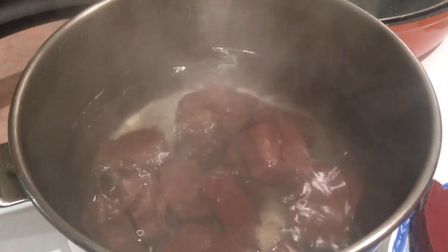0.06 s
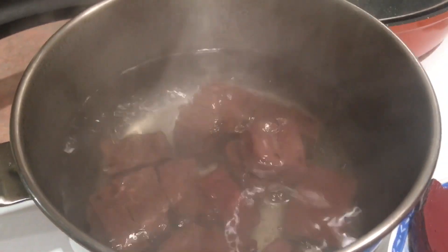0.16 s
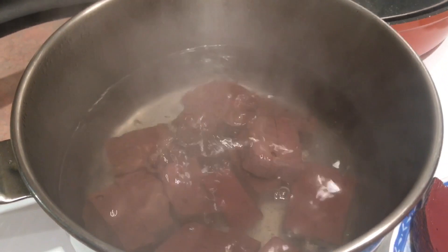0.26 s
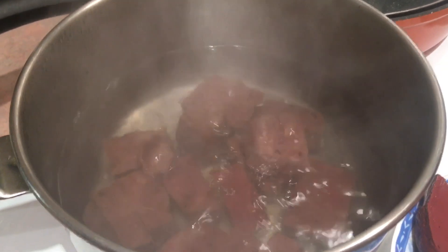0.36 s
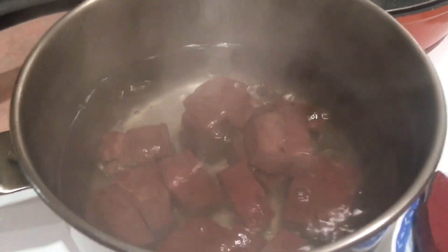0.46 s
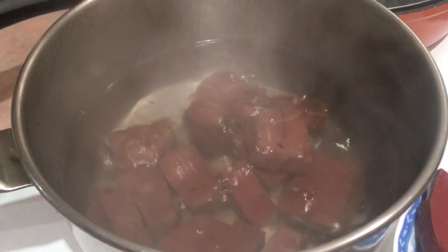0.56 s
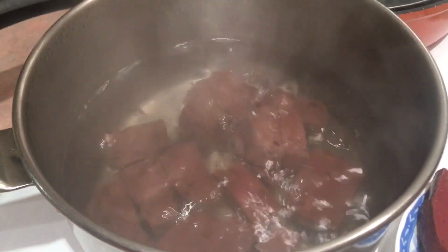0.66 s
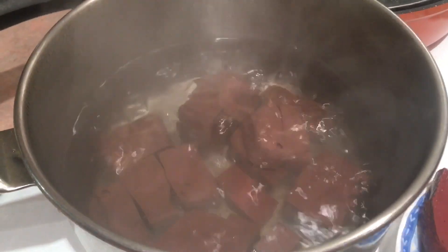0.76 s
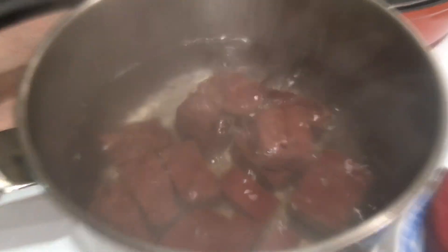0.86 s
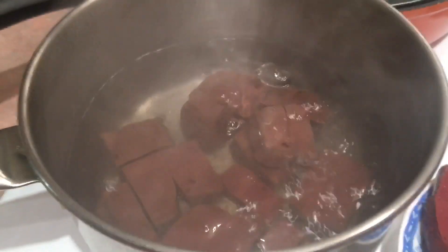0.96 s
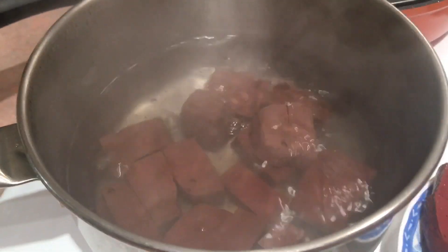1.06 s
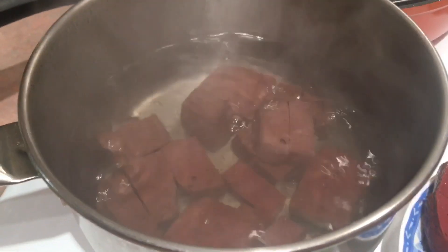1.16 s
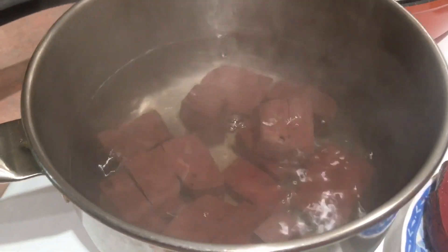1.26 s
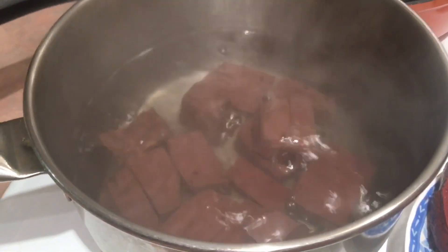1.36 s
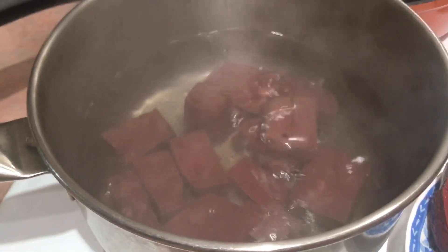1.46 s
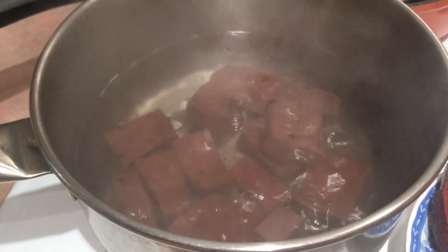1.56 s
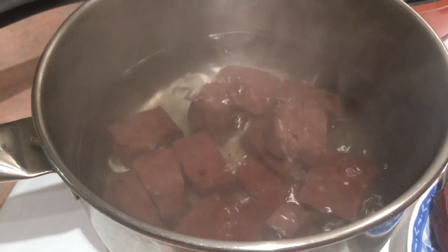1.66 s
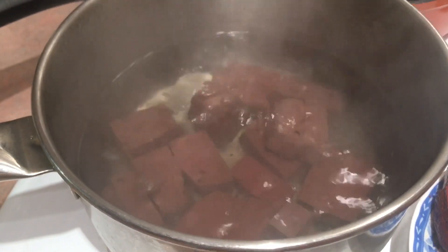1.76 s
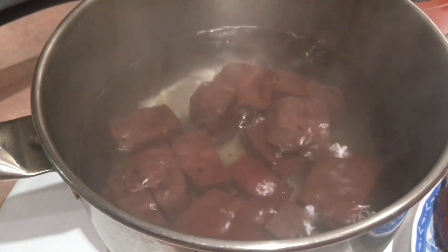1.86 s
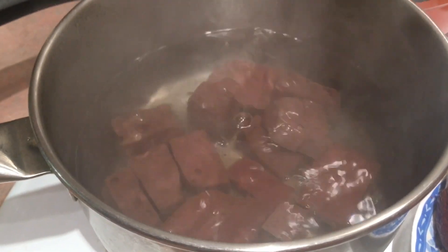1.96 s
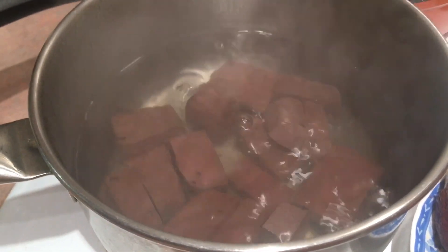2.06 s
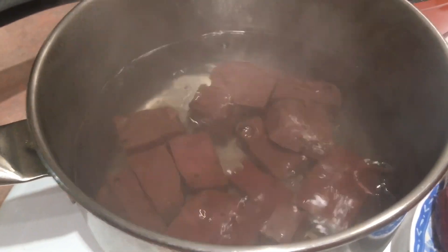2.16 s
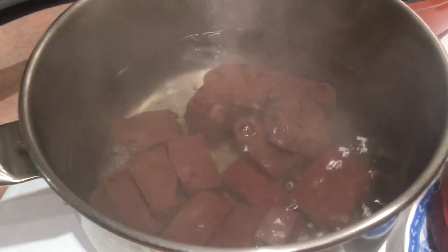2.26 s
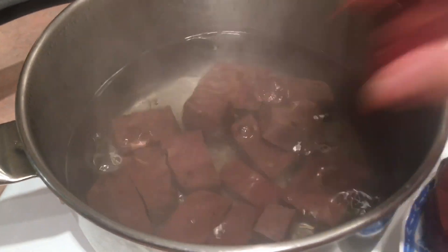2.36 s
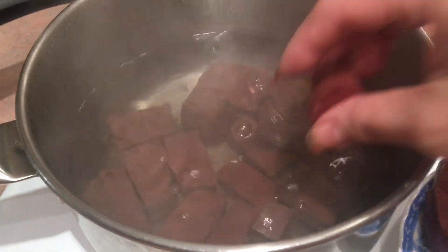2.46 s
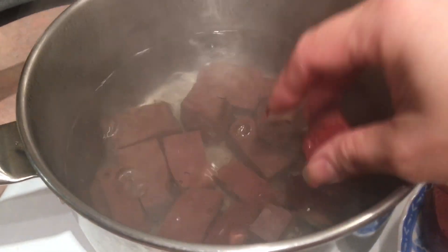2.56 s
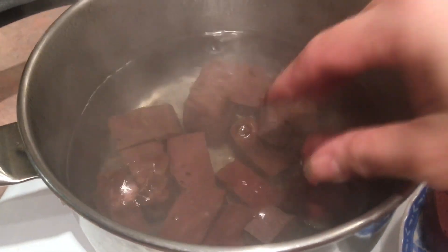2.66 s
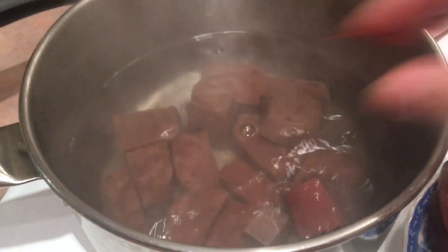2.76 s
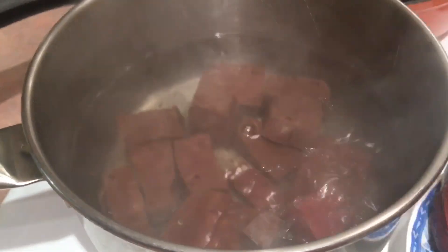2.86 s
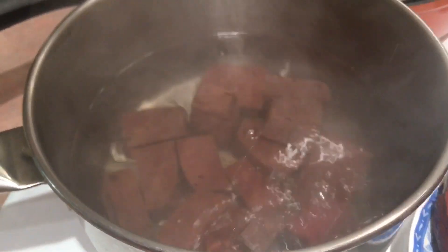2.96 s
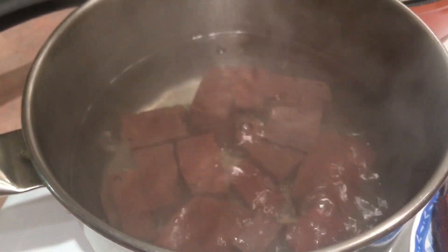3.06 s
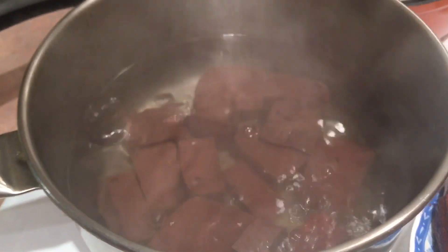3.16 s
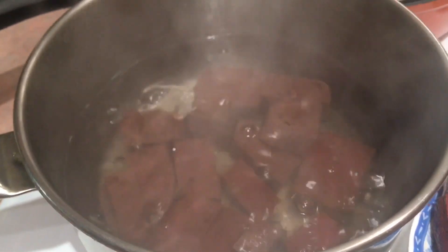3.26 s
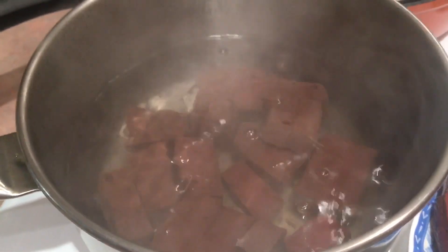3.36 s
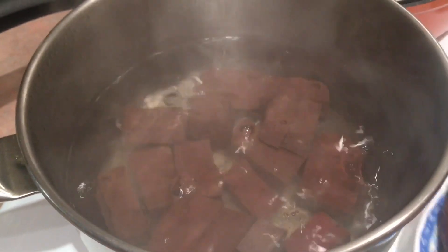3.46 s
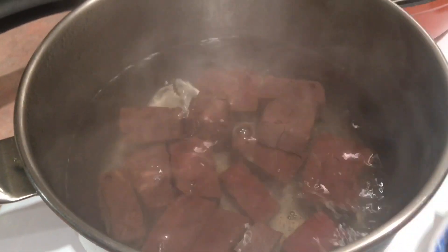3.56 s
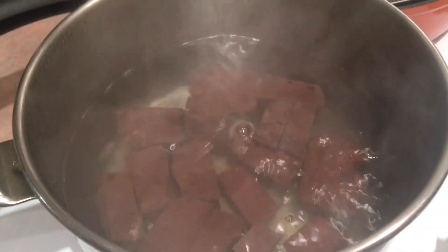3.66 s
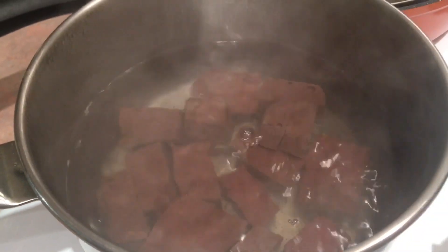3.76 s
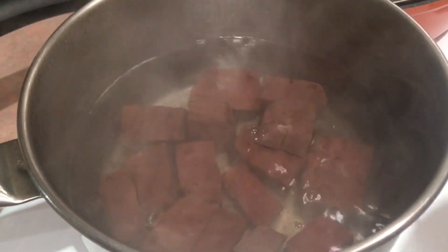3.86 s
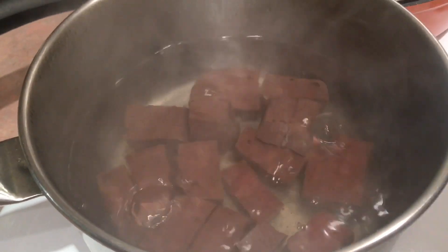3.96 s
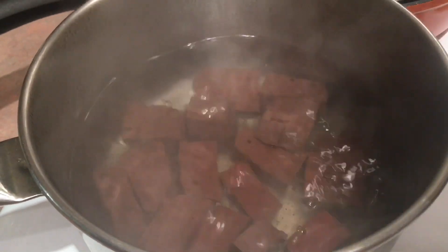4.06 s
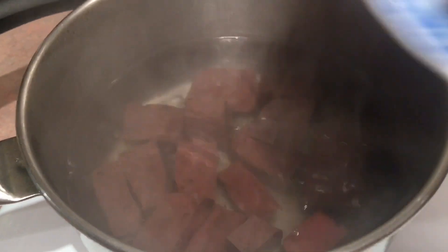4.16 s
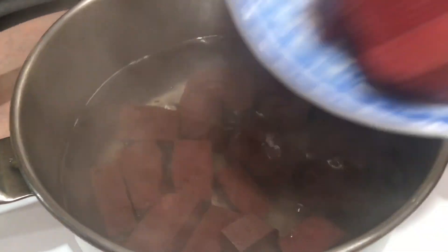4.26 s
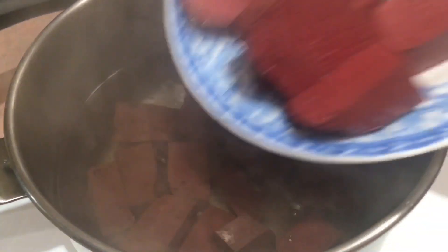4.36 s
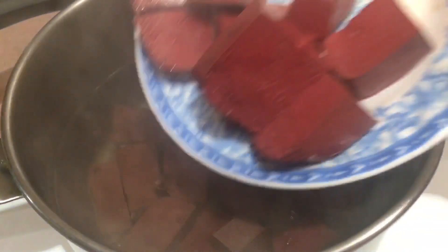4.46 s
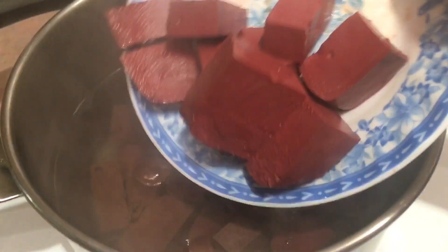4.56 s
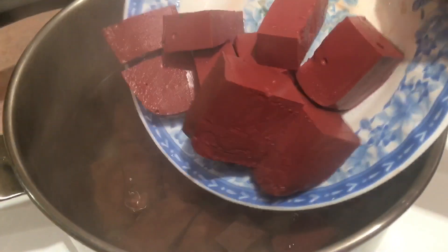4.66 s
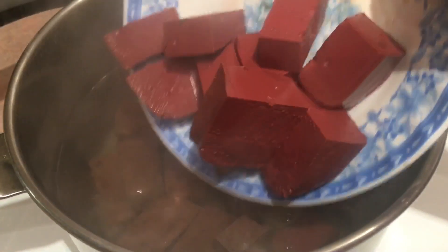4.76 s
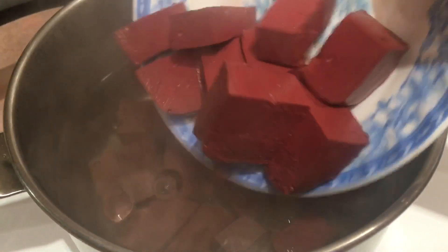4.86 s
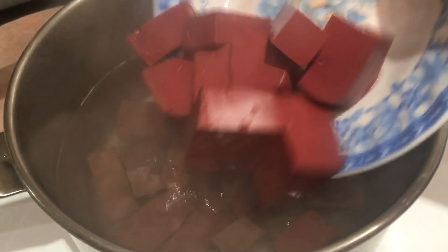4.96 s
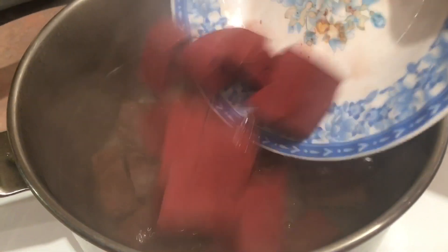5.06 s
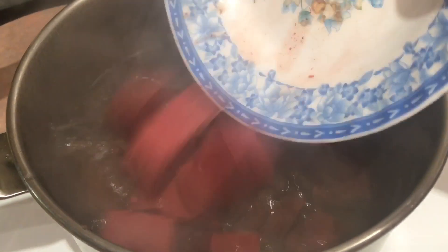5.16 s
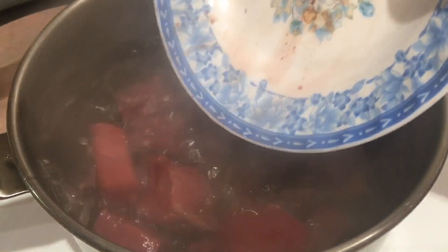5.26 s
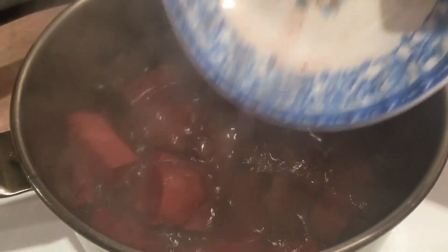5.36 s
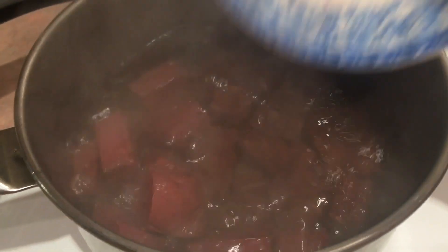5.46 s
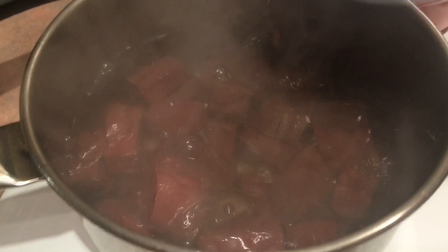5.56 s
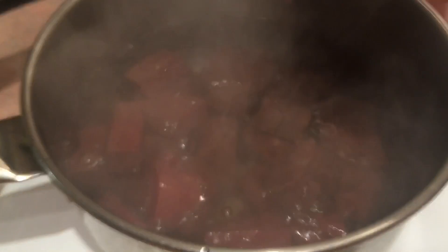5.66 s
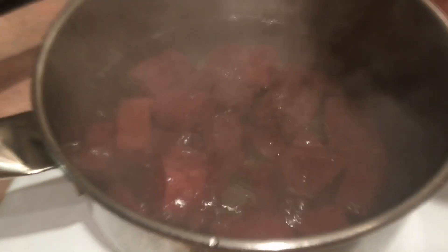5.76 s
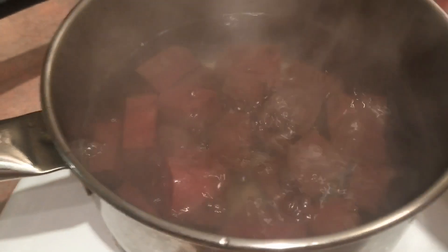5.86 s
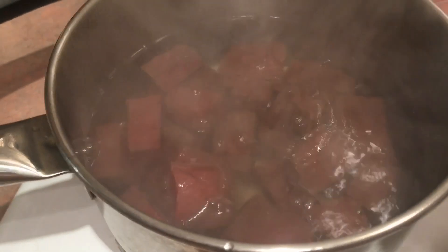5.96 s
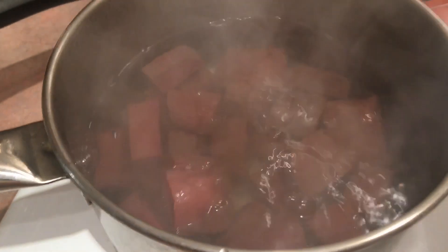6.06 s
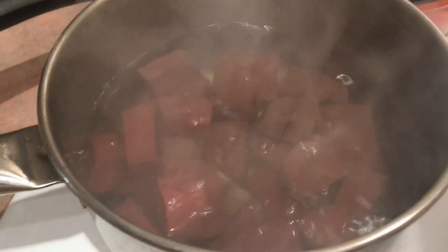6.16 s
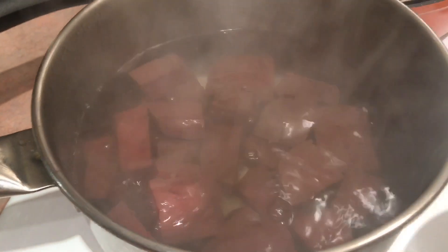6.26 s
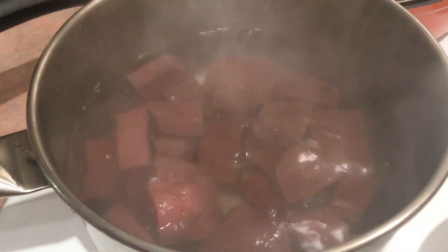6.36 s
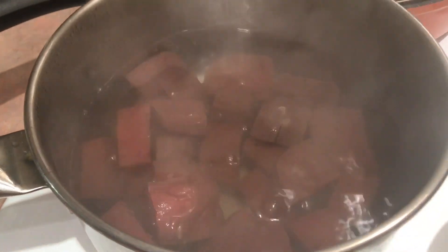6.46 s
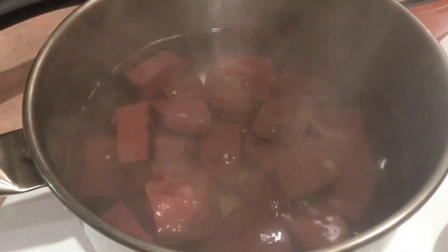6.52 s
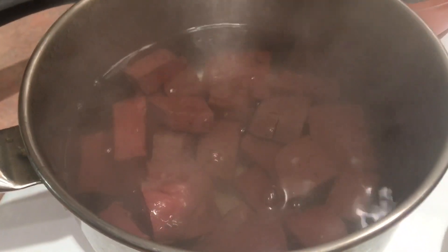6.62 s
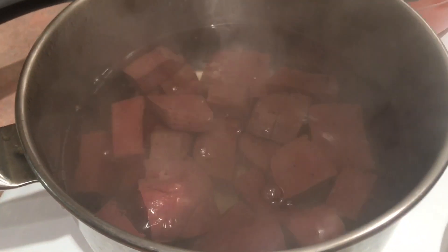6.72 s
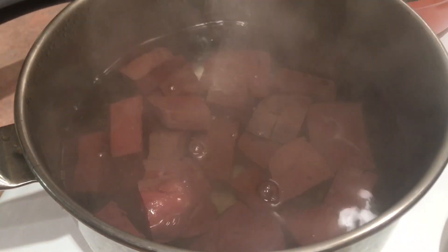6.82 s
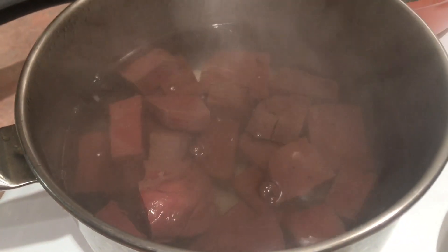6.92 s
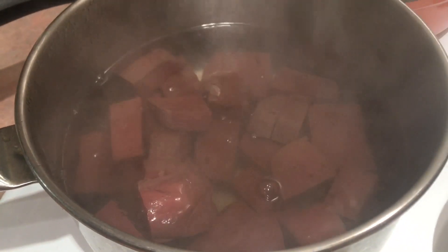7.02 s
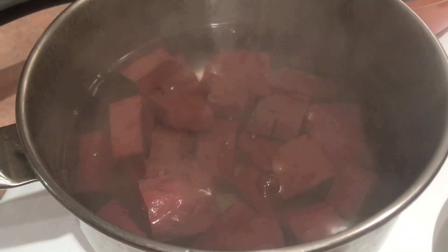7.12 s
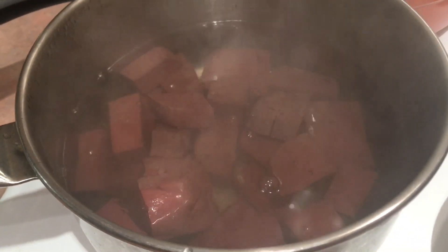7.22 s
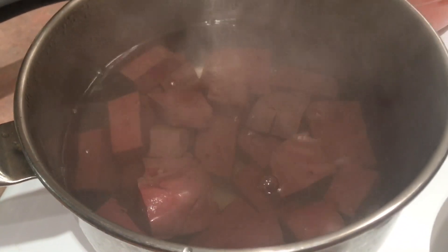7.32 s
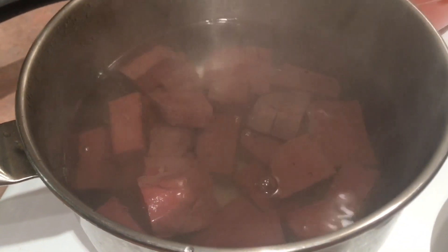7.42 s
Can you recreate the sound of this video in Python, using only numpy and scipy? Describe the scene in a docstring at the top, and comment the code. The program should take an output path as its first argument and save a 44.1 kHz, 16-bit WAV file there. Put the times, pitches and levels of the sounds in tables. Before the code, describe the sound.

Close to a steel pot in a small, hard-walled kitchen, boiling water bubbles and spits throughout over a faint hum and hiss. After a few light crockery clinks and low thumps comes one loud plop of food hitting the water, then a quick flurry of splashes as more cubes slide in. A plate cracks brightly against the rim, drags along it and lands on the counter with a duller knock.

```python
"""A kitchen, small and hard-walled, one microphone close to a steel pot of water boiling on the stove.
Vapour bubbles collapse in bunches and knock the pot wall; cubes of food slide in, plop and splash.
A plate strikes the rim, drags along it and is set down on the counter. Crockery clinks nearby and
dull bumps come through the stove top. Behind it all lie a fine fizz, a mains hum, a low tone that
comes and goes, a low rumble and a steady hiss."""
import sys
import numpy as np
from scipy import signal
from scipy.fft import rfft, irfft, next_fast_len
from scipy.io import wavfile
from scipy.ndimage import uniform_filter1d

SR = 44100
rng = np.random.default_rng(int(sys.argv[2]) if len(sys.argv) > 2 else 0)


def put_to_file(sound):
    """Save the sound as 16-bit audio at rate SR, in the file named by the first command-line argument."""
    columns = np.atleast_2d(sound).T  # one column per channel
    safe = np.clip(columns, -1, 1)
    whole_steps = np.round(safe * 32767)
    wavfile.write(sys.argv[1], SR, whole_steps.astype(np.int16))


N = 330309

# modes of the plate against the pot rim: pitch_hz, level_db, t60_s
RIM_MODES = [(159, -20, 0.13), (412.5, -17, 0.049), (576, -21, 0.069), (704, -6, 0.12), (1110, -10, 0.16),
             (1586, -4.5, 0.032), (2012, -14, 0.078), (2560, -16, 0.045), (2770, -17, 0.089),
             (3070, -10, 0.036), (3250, -19, 0.069), (3510, -3.5, 0.035), (4430, -8, 0.071),
             (4940, -19, 0.074), (5200, -30, 0.04), (6330, 2.5, 0.029), (6660, -19, 0.073),
             (7340, -10, 0.047), (8740, -5, 0.026), (11900, -2, 0.024)]


def boil():
    """Bubbles of very unlike sizes collapse in bunches, each a soft push into the pot's modes."""
    # vigour of the boil: time_s, level_db
    vigour = [(0.0, -49.5), (0.21, -50.5), (2.09, -50.5), (2.86, -48.5), (3.15, -47.5), (4.57, -52.5),
              (5.23, -47.5), (5.65, -51), (5.82, -50), (6.55, -49), (7.07, -49.5), (7.49, -51.5)]
    # modes of the water-filled pot: pitch_hz, width_hz, level_db
    pot_modes = [(243, 206, 1.5), (320, 53, 1), (502, 43, -3), (644, 47, 0.5), (731, 25, -7), (846, 95, -6),
                 (988, 28, -6.5), (1142, 45, -3), (1190, 410, -3.5), (1735, 41, -6.5), (2063, 180, 1),
                 (2424, 68, 0), (3200, 150, -16), (4070, 440, -4)]
    base_rate_hz, push_s = 450, .0006
    bunching_db = np.minimum(0.49 * walk(14) + 7.5 * walk(60), 10)
    chance = base_rate_hz / SR * undb(bunching_db)
    sizes = np.minimum(rng.exponential(size=N), 3.5)
    collapses = (rng.random(N) < chance) * undb(3.7 * sizes) * np.sign(noise(N))
    pushes = np.convolve(collapses, np.hanning(3 + int(push_s * SR)), "same")
    drive = level(pushes, 0) + level(noise(N), -9)
    rings = sum((-1) ** k * undb(db) * band(drive, hz, width) / np.sqrt(width)
                for k, (hz, width, db) in enumerate(pot_modes))
    water = level(rings, 0) + level(surface_bubbles(), -7.5)
    surge_db = .8 * walk(8)
    return water * undb(curve(vigour) + surge_db)


def surface_bubbles():
    """Bubbles burst at the surface in groups of four; each rings a few cycles and rises in pitch."""
    out = np.zeros(N)
    for when, group in zip(rng.random(220), rng.random((220, 4, 3))):
        for late, pitch, softness in group:
            hz = 420 * 3.21 ** pitch ** 1.606
            ring = damped_tone(hz, t60=18 / hz, glide=0.083, rise_s=2 / hz)
            add(out, when * N / SR + .045 * late, undb(-14 * softness) * ring)
    return out


def knocks():
    """The strongest collapses knock the wall: a low ragged tone, an upper ring, a blur of other modes."""
    # start_s, level_db, pitch_hz, upper_ring_hz, upper_ring_relative_db
    collapses = [(0.297, -48, 473, 1190, -16), (0.416, -36, 626, 880, -17), (0.554, -40, 420, 880, -12),
                 (0.612, -34, 600, 1150, -7), (0.983, -37, 626, 970, -6), (1.03, -39, 613, 1160, -12),
                 (1.091, -37, 660, 1160, -1), (1.112, -29, 650, 1220, -18), (1.224, -33.5, 546, 1230, -11),
                 (1.247, -37.5, 514, 1200, 0.5), (1.321, -35, 630, 1000, -14), (1.343, -37, 720, 970, -13),
                 (1.448, -39, 690, 1140, 2), (1.467, -46, 794, 1220, -2), (1.561, -38, 503, 1070, -8),
                 (1.915, -43, 640, 1000, -1), (2.036, -54, 654, 940, -15), (2.107, -37, 670, 1070, -14),
                 (2.12, -34, 638, 851, -21), (2.147, -35.5, 514, 974, -16), (2.184, -40, 626, 1020, -8),
                 (2.261, -40, 457, 1010, -1), (2.364, -34, 567, 1170, -7), (2.385, -41.5, 470, 1170, 7),
                 (2.485, -41.5, 436, 982, 4), (2.5, -35, 644, 980, -12), (2.518, -36, 606, 1250, -15),
                 (2.539, -36, 625, 856, -7), (2.66, -29.5, 510, 1100, -8), (3.152, -35.5, 490, 1100, -4),
                 (3.201, -28, 625, 886, -15), (3.333, -40, 635, 1090, -3), (3.483, -34.5, 650, 1130, -6),
                 (3.627, -32, 640, 1240, -13), (3.654, -37.5, 635, 1000, -1.5), (3.704, -36, 530, 1180, -4),
                 (3.747, -36.5, 654, 1280, -2), (3.865, -34, 630, 1260, -7), (4.063, -34.5, 650, 860, -11),
                 (4.187, -31.5, 690, 1190, -13), (4.224, -38, 680, 885, -1), (4.251, -29.5, 654, 1170, -12),
                 (4.274, -38, 610, 980, -8), (4.303, -33.5, 634, 990, -11), (4.378, -32.5, 500, 920, -10),
                 (4.406, -28, 654, 967, -7.5), (4.585, -30, 641, 1240, -10), (4.602, -36, 799, 984, -4),
                 (4.926, -30, 640, 980, -7.5), (5.01, -31.5, 627, 1340, -7), (5.081, -31, 675, 896, -22),
                 (5.243, -38, 540, 1880, 2), (5.255, -29.5, 696, 860, -9), (5.339, -32.5, 686, 890, -3),
                 (5.629, -41, 654, 1050, 1), (5.699, -30.5, 648, 1250, -7), (5.772, -31, 532, 982, -29),
                 (6.081, -34, 649, 985, -14), (6.157, -35, 650, 1260, -13), (6.307, -35, 624, 980, -6),
                 (6.355, -36, 624, 899, -19), (6.376, -29, 510, 996, -8.5), (6.507, -46, 514, 1160, 6.5),
                 (6.832, -33, 493, 1026, -5), (7.0, -33, 510, 1140, -21), (7.07, -28, 612, 1150, -16),
                 (6.872, -36, 640, 1130, -8), (6.895, -33, 657, 1100, -10), (6.962, -38, 640, 1280, -2),
                 (7.155, -38, 474, 895, -5), (7.195, -42.5, 660, 980, -1), (7.325, -33, 560, 900, -19),
                 (7.35, -38, 552, 1150, -13), (7.408, -38, 630, 1050, -10)]
    out, t60 = np.zeros(N), 0.044
    for s, db, hz, upper_hz, upper_db in collapses:
        add(out, s, undb(db - 2.2) * damped_tone(hz, t60, 0.031, .0033))
        ragged = band(burst(hz, 0.46 * hz, 1.5 * t60, 0.0069), hz, .5 * hz)
        add(out, s - .004, undb(db - 9) * ragged)
        add(out, s, undb(db + upper_db - 1.5) * damped_tone(upper_hz, 1.14 * t60, .05, 0.0049))
        other_modes = band(burst(1080, 630, 1.3 * t60, 0.0087), 1220, 790)
        add(out, s, undb(db + upper_db) * other_modes)
    return out


def plops():
    """Cubes of food drop into the water: a tone that sinks in pitch inside a puff of noise."""
    # start_s, level_db, pitch_hz, t60_s
    cubes = [(2.7246, -7, 650, 0.008), (5.127, -27.5, 880, 0.032), (5.2, -28, 800, 0.039),
             (5.208, -13.5, 860, 0.023)]
    out = np.zeros(N)
    for s, db, hz, t60 in cubes:
        add(out, s, undb(db) * damped_tone(hz, t60, glide=-0.46, rise_s=1.09 / hz))
        add(out, s, undb(db - 15.5) * band(burst(hz, .8 * hz, 0.066, 0.0043), hz, .8 * hz))
    return out


def spits():
    """A splash or spit is a small ragged bubble with a burst of spray around it and a wet spatter after."""
    # start_s, level_db, pitch_hz, spray_db
    splashes = [(0.846, -38, 6000, -31.5), (0.853, -41, 5960, -45), (0.866, -41, 6000, -52),
                (0.873, -40, 5670, -55), (1.3513, -33.5, 2100, -58), (2.6398, -30, 8400, -28.5),
                (2.6398, -29, 1990, -56), (2.651, -35, 1800, -60), (2.6856, -31.5, 11200, -48),
                (2.687, -47, 4180, -60), (2.676, -43, 7500, -60), (2.718, -38, 9300, -60),
                (2.7315, -44, 2860, -50), (5.2, -38, 1890, -55), (5.214, -38, 2280, -55),
                (5.22, -41, 3500, -55), (5.114, -38, 3980, -55), (6.1555, -42, 3700, -55),
                (6.439, -46, 3100, -55), (2.692, -38, 3540, -58), (2.705, -34, 1800, -58),
                (2.706, -43, 3800, -58), (2.6973, -29, 2270, -58), (2.7, -30, 2300, -60),
                (2.7176, -25, 2110, -50), (2.7241, -20, 2050, -27.5), (2.765, -53, 2025, -40),
                (3.237, -42, 3200, -56), (3.489, -39, 2860, -44), (3.3194, -39, 4120, -55),
                (3.652, -36.5, 1580, -62), (3.773, -37.5, 3180, -50), (4.8505, -49, 2320, -37),
                (4.984, -31, 7700, -41), (4.9828, -30.5, 5900, -55), (5.0262, -44, 12000, -50),
                (5.039, -33, 8040, -50), (5.0855, -39, 12500, -55), (5.101, -42, 11500, -58),
                (5.129, -30, 3100, -43), (5.1592, -36, 6960, -48), (5.1852, -39, 14500, -57),
                (5.3893, -48, 13900, -55), (4.997, -39, 3380, -55), (5.031, -26, 4030, -35),
                (5.043, -31, 4400, -40), (5.08, -26.5, 3600, -49), (5.095, -27, 6400, -45),
                (5.123, -32, 2050, -37), (5.136, -36, 6950, -45), (5.1595, -33.5, 2130, -44),
                (5.167, -29.5, 7080, -54), (5.1748, -30, 3940, -37), (5.2427, -28, 1950, -61),
                (5.255, -34, 2390, -57), (5.244, -32.5, 4160, -50), (5.257, -33, 3600, -54),
                (5.282, -36, 3000, -50), (5.2864, -22, 2600, -36.5), (5.321, -37, 2070, -39),
                (5.34, -45, 1500, -47), (5.3637, -31.5, 3000, -40), (5.625, -41, 5760, -52),
                (5.631, -39, 6100, -60), (5.656, -48, 6800, -60), (5.6705, -39, 6500, -48),
                (5.691, -43, 5770, -60), (5.758, -43, 5670, -60), (5.762, -46, 10500, -60),
                (5.664, -39, 5900, -47), (5.679, -34, 5870, -50), (5.6848, -39, 6400, -38),
                (5.7316, -40, 5600, -47), (0.748, -45, 6000, -60), (0.765, -43, 5800, -60),
                (3.029, -35.5, 11000, -48), (3.031, -36, 4600, -55), (3.047, -41, 5300, -60),
                (3.2, -43, 4200, -60), (3.76, -42, 8900, -60), (6.07, -45, 6700, -56),
                (6.1544, -42, 2000, -57), (6.4368, -36.5, 1910, -60), (7.111, -32.5, 1910, -45)]
    faint_spits = [(when * N / SR, -46.5 - 10 * softness, 1600 * 5.5 ** pitch, -45.5)
                   for when, softness, pitch in rng.random((60, 3))]
    out, t60, rise_s = np.zeros(N), 0.022, 0.0002
    for s, db, hz, spray_db in splashes + faint_spits:
        glide = 0.29 * min(1, 6000 / hz) ** 2
        add(out, s, undb(db - 9) * damped_tone(hz, t60 * (3000 / hz) ** 0.21, glide, rise_s))
        ragged = band(burst(hz, 0.5 * hz, 0.83 * t60, rise_s), hz, 1.14 * hz)
        add(out, s, undb(db - 5.5) * ragged)
        spatter = band(burst(hz, 1.2 * hz, .07, 0.0058), hz, 1.5 * hz)
        add(out, s, undb(db - 21) * spatter)
        add(out, s, undb(spray_db + 1.5) * burst(6500, 10000, 0.007, 0.00065))
    return out


def plate_on_rim():
    """The plate strikes the steel rim with a bright crack and a short ring."""
    return strike(RIM_MODES, start_s=5.8705, ring_db=-17.5, rise_cycles=1.25, clatter_db=-19,
                  clatter_t60=0.049, crack_db=-16, crack_hz=6500, bounces_s=(0, 0.0026, 0.0024))


def plate_scrape():
    """The plate drags along the rim: rough friction feeds all modes a little and a favoured one most."""
    # course of the drag: time_s, level_db, favoured_mode_hz
    drag = [(5.875, -37, 1000), (5.896, -31.5, 1110), (5.912, -40.5, 2000), (5.925, -37.5, 2090),
            (5.936, -41, 3280), (5.956, -35.5, 3250), (5.964, -37.5, 2760), (5.976, -43, 2760),
            (5.99, -59, 1100), (6.03, -59, 1100)]
    s, db, favoured_hz = np.transpose(drag)
    t = np.arange(N) / SR
    grit = noise(N) * undb(1.6 * walk(220))
    favoured_log_hz = np.interp(t, s, np.log(favoured_hz))
    rings = np.zeros(N)
    for hz, _, t60 in RIM_MODES:
        flicker_db = np.clip(3.5 * walk(70), -12, 3)
        favour_db = 10 * np.exp(-((np.log(hz) - favoured_log_hz) / 0.06) ** 2)
        weight = min(3000 / hz, hz / 700) ** 0.46 * min(t60 / 0.088, 1) ** 1.4
        rings += undb(flicker_db + favour_db) * weight * band(grit, hz, 54)
    touching = (t > s[0]) * (t < s[-1])
    rings /= np.sqrt(np.mean(rings[touching] ** 2))
    rasp = level(band(grit, 3400, 8100), -11.5)
    return undb(np.interp(t, s, db)) * touching * (rings + rasp)


def plate_on_counter():
    """The plate lands on the counter with a duller crack and a longer clatter."""
    # pitch_hz, level_db, t60_s
    counter_modes = [(140, -10, 0.19), (287, -5.5, 0.14), (359, -9.5, 0.093), (520, -4.5, 0.032),
                     (740, -6, 0.024), (643, -14, 0.089), (899, -9.5, 0.2), (980, -10, 0.083),
                     (1070, -4.5, 0.046), (1450, -4.5, 0.015), (2150, -13.5, .17), (2240, -2, 0.074),
                     (2404, -6, 0.039), (3270, -20, 0.04), (3510, -9, 0.05), (3910, -11, 0.03),
                     (4460, -11, 0.037), (5600, -14, 0.019), (6450, -6, 0.025)]
    return strike(counter_modes, start_s=6.614, ring_db=-20, rise_cycles=0.48, clatter_db=-27,
                  clatter_t60=.17, crack_db=-15, crack_hz=2870, bounces_s=(0.00026, .0022))


def strike(modes, start_s, ring_db, rise_cycles, clatter_db, clatter_t60, crack_db, crack_hz, bounces_s):
    """A hard blow: modes ring out, loose parts chatter longest in the bass, each quick bounce cracks."""
    out = np.zeros(N)
    for k, (hz, db, t60) in enumerate(modes):
        rise_s = rise_cycles / hz
        # neighbouring modes swing opposite ways
        ring = (-1) ** k * damped_tone(hz, t60, 0, rise_s * max(1, 650 / hz) ** 0.5)
        # the ring wavers as the plate rocks on its contact
        flutter_db = 4 * walk(hz / 12)[:len(ring)] * np.minimum(1, np.arange(len(ring)) / SR / 0.01)
        add(out, start_s, undb(ring_db + db + flutter_db) * ring)
        clatter = burst(hz, 0.13 * hz, clatter_t60 * (1000 / hz) ** 0.44, rise_s)
        add(out, start_s, undb(clatter_db + db) * clatter)
    for late_s in bounces_s:
        add(out, start_s + late_s, undb(crack_db) * burst(crack_hz, 0.64 * crack_hz, .012, 0.00023))
    return out


def clinks():
    """Crockery touches nearby: a short rough ring and a bright tick over a duller body."""
    # start_s, level_db, pitch_hz, body_db, t60_s
    touches = [(0.0702, -45.5, 2080, -64, .05), (0.128, -43, 2830, -69, .03),
               (0.138, -44, 2920, -66, 0.031), (0.19, -30, 3246, -43.5, .05),
               (0.22, -37.5, 2800, -60, .018), (0.352, -46, 3070, -58, .03), (0.3597, -39, 3280, -54, .03),
               (0.3757, -39.5, 3300, -52, 0.056), (0.4106, -48, 2050, -68, 0.021),
               (0.645, -44, 2020, -58, .02), (0.6907, -36, 2710, -64, 0.024),
               (0.766, -45, 2720, -61, 0.027), (0.782, -34, 3370, -43, 0.045),
               (0.8066, -36, 3280, -44, 0.033), (0.8188, -35.5, 3220, -43, 0.031),
               (0.852, -42, 2920, -50, 0.028), (1.906, -45, 2600, -61, .04), (1.926, -46, 2880, -64, .025),
               (1.945, -44, 3350, -70, 0.019), (3.029, -35, 2730, -42, 0.035)]
    out = np.zeros(N)
    for s, db, hz, body_db, t60 in touches:
        add(out, s, undb(db - 1.5) * damped_tone(hz, t60, 0, 0.00063))
        roughness = band(burst(hz, .1 * hz, 1.1 * t60, 0.00068), hz, 870)
        add(out, s, undb(db - 6) * roughness)
        tick = band(burst(4400, 4400, 0.039, 0.00065), 4700, 5500)
        add(out, s, undb(db - 8) * tick)
        body = band(burst(1370, 1400, 0.043, 0.003), 1540, 1500)
        add(out, s, undb(body_db + 9) * body)
    return out


def stove_bumps():
    """Dull, sinking thumps come through the stove top; the stove body answers late."""
    # start_s, level_db, pitch_hz, first_swing (1 out, -1 in)
    bumps = [(1.605, -24, 65.6, -1), (1.651, -27, 54, 1), (1.699, -35, 75, 1), (1.768, -33, 61.4, 1),
             (3.003, -22.5, 64, 1), (3.039, -29, 101, 1), (3.1, -29.5, 66, 1)]
    out = np.zeros(N)
    for s, db, hz, swing in bumps:
        add(out, s, undb(db) * swing * damped_tone(hz, t60=0.14, glide=-0.25, rise_s=0.0066))
        body = band(burst(280, 110, t60=0.19, rise_s=0.035), 280, 180)
        add(out, s, undb(db - 11) * body)
    return out


def sizzle():
    """Fine spray and steam fizz in the pot's mouth, swelling as food drops in; each resonance flickers."""
    # time_s, level_db
    swell = [(0.0, -54.5), (1.44, -55), (2.5, -57), (3.17, -53), (4.04, -56), (4.8, -56), (5.15, -49.5),
             (5.49, -57), (7.49, -56)]
    # hollow resonances of the mouth: pitch_hz, width_hz, level_db
    mouth = [(3294, 450, 9), (6990, 145, 4), (8030, 210, 0), (3530, 1430, 4), (4230, 165, 7),
             (4553, 34, 6.5), (5320, 620, 1.5), (6080, 51, 3.5), (6680, 350, 8), (6640, 234, 11.5),
             (7850, 120, 1.5), (8880, 1300, 0), (9800, 770, -0.5), (11630, 1050, -5)]
    droplets = noise(N) * undb(1.8 * walk(150) + 0.3 * walk(21.1))
    fizz = sum((-1) ** k * undb(db + .4 * walk(2.3) + 1.1 * walk(12)) * band(droplets, hz, width)
               for k, (hz, width, db) in enumerate(mouth))
    return level(fizz, -4.5) * undb(curve(swell))


def mains_hum(hz=119.9, db=-48.5):
    """The mains hum is one tone, slightly unsteady in level and phase."""
    t = np.arange(N) / SR
    amplitude = np.sqrt(2) * undb(db + 1.02 * walk(19) + walk(4.06))
    return amplitude * np.sin(2 * np.pi * hz * t + 0.81 * walk(6))


def drone():
    """A low tone comes and goes: it fades in, holds with a slight waver and blur, and fades out."""
    # start_s, length_s, pitch_hz, level_db
    swells = [(3.14, 0.51, 256.2, -51), (4.34, 0.53, 256, -52), (5.346, 0.18, 251.5, -51.5),
              (6.24, 0.34, 257, -55.5), (6.665, 0.12, 232, -43)]
    t, out = np.arange(N) / SR, np.zeros(N)
    waver, edge_s = 1.43 * walk(4.6), 0.022
    for s, length, hz, db in swells:
        envelope = np.clip(np.minimum(t - s, s + length - t) / edge_s + .5, 0, 1) ** 2
        tone = np.sqrt(2) * np.sin(2 * np.pi * hz * t + waver)
        blur = level(band(band(noise(N), hz, 20), hz, 13), -15.5)
        out += undb(db) * envelope * (tone + blur)
    return out


def room_tone():
    """The kitchen's own air: a steady hiss over a low rumble that breathes a little."""
    # frequency_hz, relative_density_db
    spectrum = [(12, -25), (27, -7.5), (38, -4.5), (55, -4.5), (95, -5), (172, -17.5), (285, -10),
                (642, -24), (1500, -25), (2700, -33), (4300, -40), (6700, -33), (10500, -40), (12500, -39),
                (16000, -37)]
    corner_hz, corner_db = np.transpose(spectrum)
    size = next_fast_len(N)
    hz = np.arange(1, size // 2 + 2) * SR / size
    colour = undb(np.interp(np.log(hz), np.log(corner_hz), corner_db))
    air = level(irfft(rfft(noise(size)) * colour, size)[:N], -50)
    rumble = signal.lfilter(*signal.butter(2, 900, fs=SR), air)
    hiss = air - rumble
    return hiss + rumble * undb(0.47 * walk(1.68) + 2.8 * walk(25))


def room_echo(near):
    """Walls and tiles return a dense, dull tail a few milliseconds late."""
    t, decay = fade(t60=0.35)
    tail = band(noise(SR), 2350, 4300)[:len(t)] * decay * (t > .004)
    return signal.fftconvolve(near, tail / np.sqrt(np.sum(tail ** 2)))[:N]


def damped_tone(hz, t60, glide, rise_s):
    """A dying sine whose pitch moves from hz to hz * (1 + 2 * glide)."""
    t, decay = fade(t60, rise_s)
    return decay * np.sin(2 * np.pi * hz * t * (1 + glide * t / t[-1]))


def burst(hz, width_hz, t60, rise_s):
    """A dying puff of noise around one pitch, at most 0.2 s long."""
    decay = fade(min(t60, .2), rise_s)[1]
    return decay * level(band(noise(10000), hz, width_hz), 0)[-len(decay):]


def fade(t60, rise_s=0):
    """Time axis and envelope: an optional soft rise and an exponential decay down to -60 dB."""
    t60 = np.clip(t60, .002, .9)
    t = np.arange(int(t60 * SR)) / SR
    rise = np.minimum(1, (t + 1 / SR) / (rise_s + 1 / SR))
    return t, rise * np.exp(-np.log(1000) * t / t60)


def band(x, hz, width_hz):
    """One resonance, gain 1 at the centre."""
    return signal.lfilter(*signal.iirpeak(hz, hz / width_hz, fs=SR), x)


def walk(rate_hz):
    """Random levels held 1 / rate_hz seconds and smoothed twice; spread near 1."""
    hold = int(SR / rate_hz)
    held = noise(N // hold + 1)[np.arange(N) // hold]
    return 1.3 * uniform_filter1d(uniform_filter1d(held, hold), hold)


def noise(count):
    return rng.standard_normal(count)


def undb(db):
    return 10 ** (np.asarray(db) / 20)


def level(x, rms_db):
    return x * undb(rms_db) / np.sqrt(np.mean(x ** 2))


def curve(table):
    s, value = np.transpose(table)
    return np.interp(np.arange(N) / SR, s, value)


def add(out, start_s, x):
    i = min(int(start_s * SR), N)
    out[i:i + len(x)] += x[:N - i]


def scene():
    """In mono: pot and crockery up close with a little of the room, the fizz and background behind."""
    near = boil() + knocks() + plops() + spits() + clinks() + stove_bumps()
    near += plate_scrape() + plate_on_rim() + plate_on_counter()
    return (near + undb(-20) * room_echo(near) + sizzle() + mains_hum() + room_tone() + drone())[None]


def record(dry):
    """The input stage rounds the hardest peaks and the recorder cuts the top steeply."""
    ceiling, top_hz = .75, 15700
    rounded = ceiling * np.tanh(dry / ceiling)
    return signal.sosfilt(signal.ellip(10, .2, 70, top_hz, fs=SR, output="sos"), rounded)


dry = scene()
out = record(dry)
put_to_file(out)
```